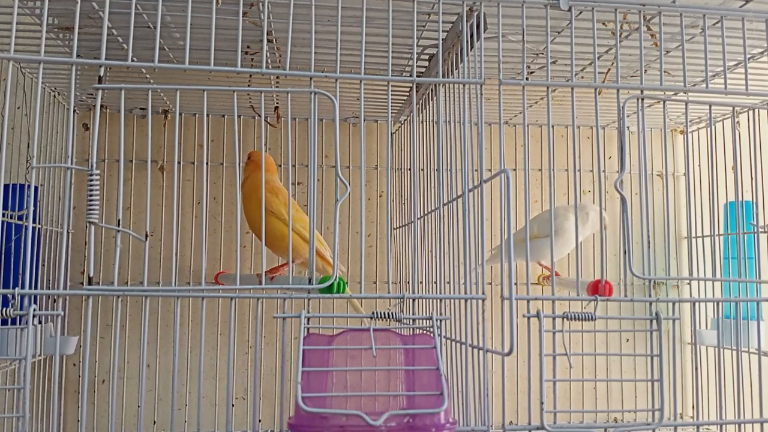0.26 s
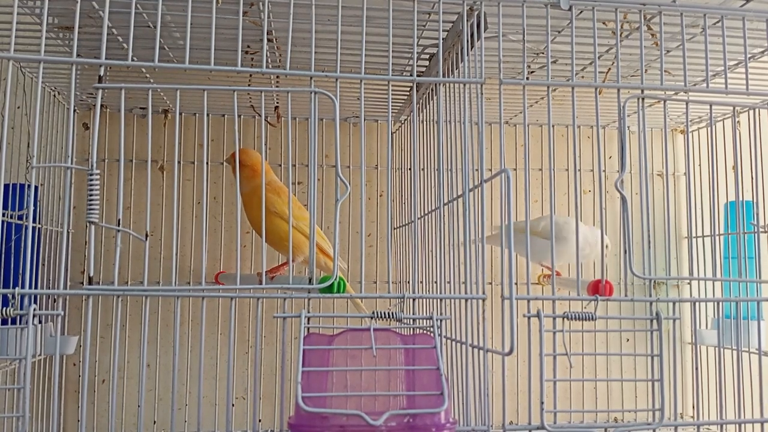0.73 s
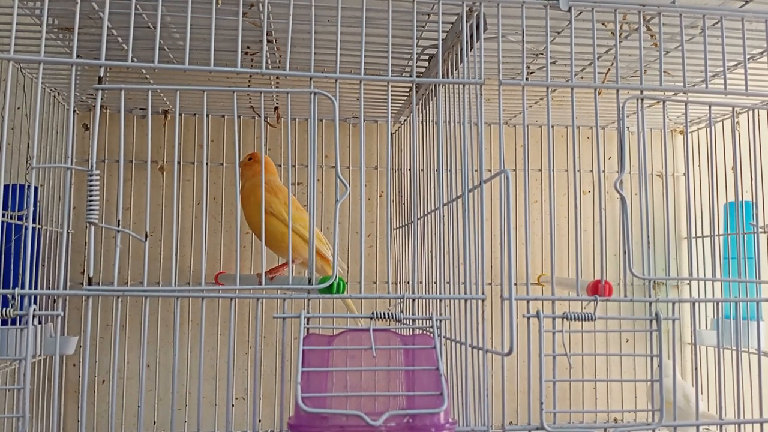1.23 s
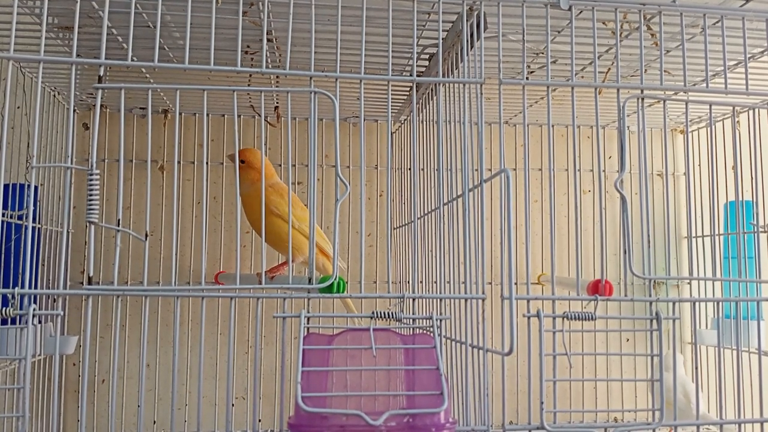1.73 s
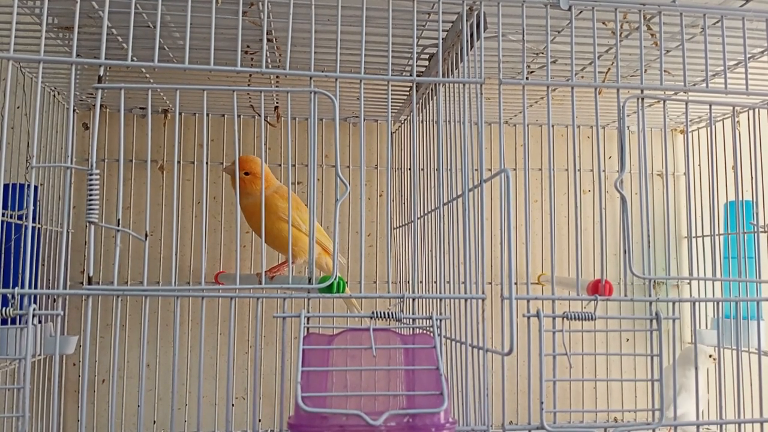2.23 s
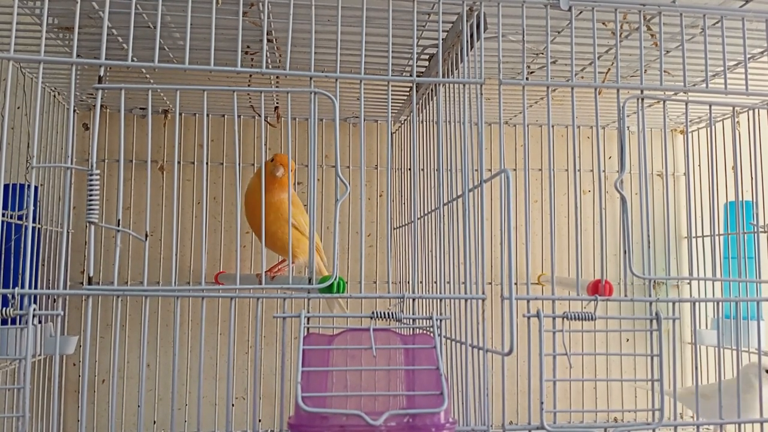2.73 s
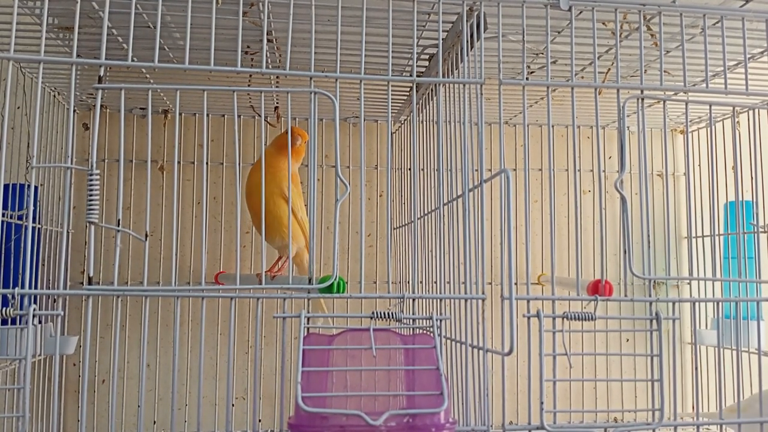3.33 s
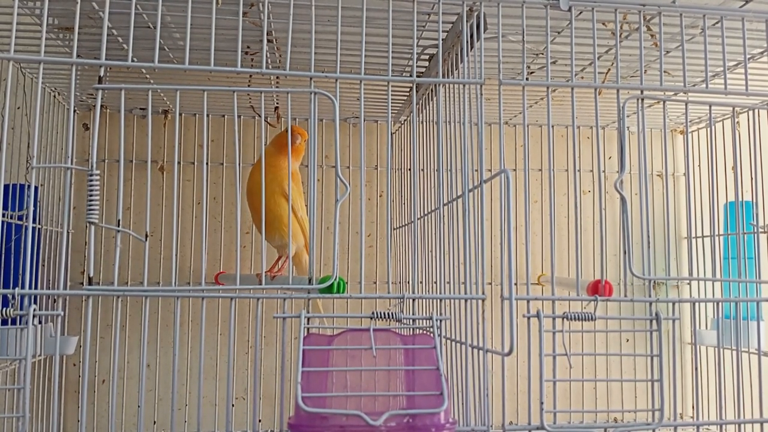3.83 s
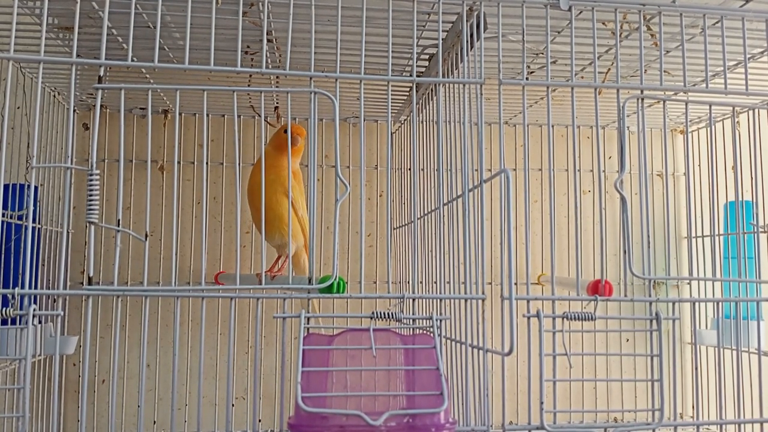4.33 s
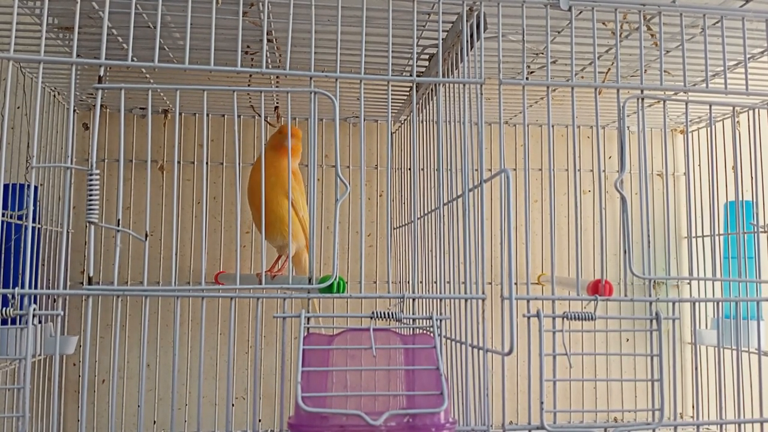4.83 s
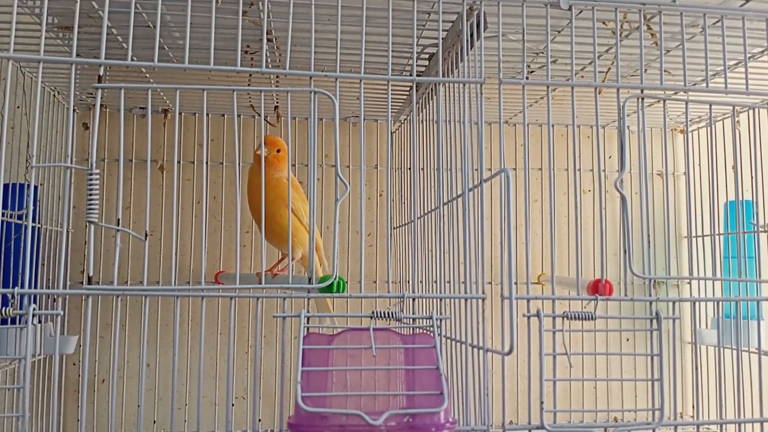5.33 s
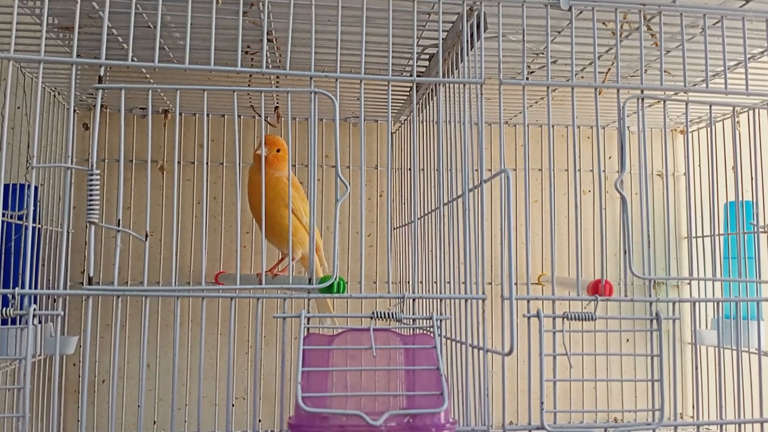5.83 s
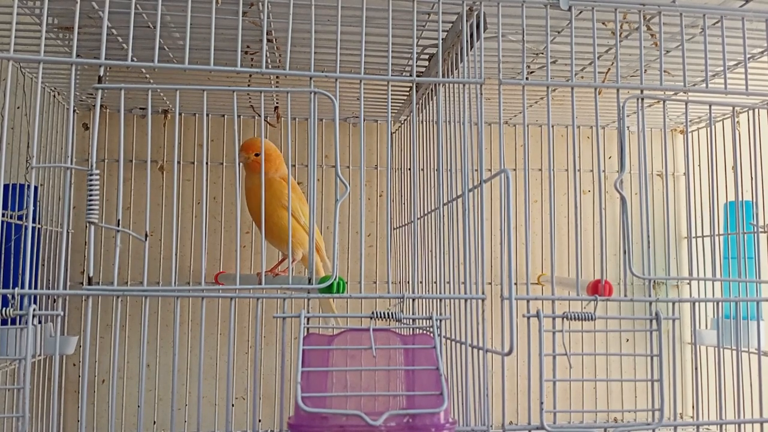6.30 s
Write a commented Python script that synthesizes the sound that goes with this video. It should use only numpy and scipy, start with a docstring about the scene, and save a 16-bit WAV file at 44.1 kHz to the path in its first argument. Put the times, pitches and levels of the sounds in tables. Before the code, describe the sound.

Bright canary song with a fast trill, then overlapping hooked chirps and whistles, a quieter lull and a final burst, in a hard-walled room.

```python
"""Canaries sing over one another in wire cages in a small hard-walled room, heard mostly off the walls.
Each note is a gliding near-sine from the syrinx with faint overtones and a puff of air.
Below lie a steady ventilation-like rush of banded noise and a low wavering drone of resonant noise;
late on, claws tick faintly on a wire. The microphone bends loud notes, colours the treble and is limited."""
import sys
import numpy as np
from scipy import signal
from scipy.fft import rfft, irfft
from scipy.io import wavfile
from scipy.ndimage import uniform_filter1d, minimum_filter1d

SR = 44100
rng = np.random.default_rng(int(sys.argv[2]) if len(sys.argv) > 2 else 0)


def wav_record(signal):
    """Record a signal, one row per channel, as 16-bit PCM in the file named by sys.argv[1]."""
    frames = np.transpose(np.atleast_2d(signal))
    bounded = np.clip(frames, -1, 1)
    # unit amplitude maps onto the largest positive 16-bit level
    quanta = np.round(bounded * 32767).astype(np.int16)
    wavfile.write(sys.argv[1], SR, quanta)


N = 289296

# Held, pure whistles. Each row: start in seconds, length in ms, start pitch in Hz, end pitch in Hz, level in dB.
WHISTLES = [(-.04, 35, 2992, 2812, 2), (-.04, 34.7, 4130, 3770, -13.5), (0.281, 26, 3150, 3070, -20.5),
            (0.361, 192, 3117, 3107, -14), (0.431, 31, 2495, 2326, -10.5), (0.499, 31, 2662, 2953, -6),
            (.525, 83, 3770, 3460, -24), (0.581, 164, 4000, 3570, -15.5), (0.628, 194, 3163, 3163, -17),
            (0.954, 192, 3185, 3090, -16.5), (1.101, 73, 2515, 2204, -16), (1.114, 16.3, 5090, 4080, -17),
            (1.139, 30, 5300, 6150, -28.5), (1.14, 18, 7500, 6630, -25), (1.173, 35, 4220, 4130, -13.5),
            (1.199, 89, 3990, 3820, -17), (1.24, 31, 2540, 2366, -12), (1.259, 107, 3086, 3065, -17.5),
            (1.48, 158, 2612, 3247, -16), (1.576, 58, 6260, 6230, -31), (1.808, 188, 3748, 3517, -12.5),
            (1.852, 24, 4050, 3940, -13), (1.888, 123, 1792, 1773, -32.5), (2.108, 41, 3476, 3600, -14.5),
            (2.134, 129, 3667, 3436, -10.5), (2.35, 36, 5090, 4730, -14), (2.32, 63, 1730, 1720, -37),
            (2.395, 162, 3501, 3505, -10.5), (2.763, 16.5, 5900, 6050, -21), (2.806, 94, 1722, 1614, -25.5),
            (3.125, 150, 1810, 1707, -24), (3.248, 31, 6490, 6510, -32.5), (3.262, 210, 3150, 3143, -27),
            (3.338, 58, 4170, 4920, -28.5), (3.477, 32, 3305, 3836, -10), (3.498, 27, 3850, 4004, -6.5),
            (3.511, 33, 4780, 6120, -26), (3.522, 8.9, 4260, 4350, -7), (3.581, 26.4, 4010, 3780, -4),
            (3.585, 52, 3186, 3170, -16.5), (3.635, 68, 3872, 4088, -11.5), (3.7, 51, 4335, 4160, -18),
            (3.688, 25, 3134, 3215, -16), (3.772, 45.5, 4220, 4105, -13), (3.88, 27, 2420, 2450, -20),
            (3.945, 94, 3160, 3090, -19), (4.324, 62, 4180, 4190, -15), (4.413, 27, 4310, 3710, -10),
            (4.717, 91, 1693, 1642, -32), (4.744, 38, 2685, 3560, -6.5), (4.801, 58, 3560, 3970, -21.5),
            (5.16, 57, 4140, 4090, -41.5), (5.55, 53, 2520, 2460, -28.5), (5.592, 76, 2737, 2826, -22),
            (5.674, 140, 2920, 3258, -25), (5.942, 116, 1732, 1687, -35.5), (6.035, 41, 3520, 3550, -41),
            (6.136, 32, 6300, 6070, -34), (6.272, 11, 3050, 3160, -7.5), (6.497, 22, 2560, 2530, -22),
            (6.54, 36, 2515, 2730, -16), (6.465, 130, 3936, 4487, -8.5), (6.502, 46, 6770, 6800, -32),
            (6.505, 19, 5800, 5740, -34), (6.546, 19, 5300, 5320, -16)]
# Octave overtone of pure notes. Each row: pitch in Hz, overtone level against the note in dB.
PURITY = [(1750, -12.5), (2450, -23), (3200, -64), (4000, -30.5), (6200, -46)]
# Hooked calls, pure or reedy, scoop up to a top and then glide off. Each row: start in seconds,
# length in ms, top pitch in Hz, end pitch in Hz, level in dB, octave overtone against the note in dB.
HOOKED_CALLS = [(1.831, 30, 2865, 2730, -14, -21.5), (2.383, 25, 3005, 2950, -15, -16),
                (2.427, 20.3, 2707, 2740, -10.5, -20.5), (2.578, 29, 4230, 3270, -8.5, -37),
                (2.641, 26.2, 4050, 3140, -9, -41), (2.716, 30.3, 3745, 3040, -11.5, -40),
                (2.961, 70, 2946, 2717, -13.5, -8), (3.109, 28, 2530, 2130, -19, -3),
                (3.136, 50.5, 2655, 2763, -12, -23), (3.444, 34, 2925, 2600, -13.5, -10.5),
                (3.495, 20.6, 2412, 2370, -14, -5.5), (3.86, 29, 2760, 2190, -19, -0.5),
                (3.894, 18, 3050, 3020, -21, -17), (3.953, 30, 2797, 2280, -15, -11),
                (4.005, 27.6, 2686, 2060, -10.5, -5), (4.064, 20, 3150, 2520, -10.5, -23),
                (4.129, 27, 2694, 1880, -18, -1.5), (4.18, 18.5, 2420, 1810, -25, -5),
                (4.209, 30, 2616, 1730, -14, -6), (4.305, 21.7, 3060, 3090, -15, -16.5),
                (4.576, 74, 2754, 2555, -13.5, -3), (4.709, 31.6, 2357, 2393, -12.5, -7),
                (5.268, 18, 4036, 4100, -33, -3), (5.271, 50, 3375, 3770, -31.5, -6),
                (5.353, 35.6, 2810, 2730, -24.5, -16.5), (5.364, 37, 3650, 3660, -26, -14),
                (5.372, 49, 3260, 3260, -27.5, -26), (6.135, 27, 2870, 2830, -21.5, -17),
                (6.197, 35, 3896, 3060, -10, -33), (6.252, 41.5, 3990, 3180, -11, -40),
                (6.307, 29.7, 2646, 2050, -13, -16.5), (6.33, 34.4, 3930, 3220, -9, -47),
                (6.374, 24.4, 2645, 1890, -14.5, -12), (6.389, 73, 3930, 3450, -19.5, -31),
                (6.452, 33, 3816, 2784, -10, -42), (6.52, 23, 2246, 2440, -16.5, -10)]
# Fast straight sweeps. Each row: start in seconds, start pitch in Hz, end pitch in Hz, level in dB.
CHIPS = [(-.037, 2585, 1480, -5.5), (-.03, 3720, 2930, 6), (.443, 4850, 6300, -31),
         (.475, 4920, 6550, -14.5), (.55, 2570, 1890, -1), (.66, 2510, 1800, -7), (0.856, 2240, 1700, -9.5),
         (0.46, 6300, 4700, -19), (1.267, 3850, 3100, -8), (1.451, 3270, 3110, -3.5),
         (1.534, 5700, 6220, -19), (1.545, 5710, 5630, -11), (1.604, 6150, 4700, -27),
         (2.066, 5930, 4070, -10.5), (2.365, 4120, 4760, -12), (2.526, 6850, 3670, -19.5),
         (2.771, 5630, 4100, -13), (3.068, 4300, 4830, -21), (3.103, 5850, 2730, -8.5),
         (3.492, 4320, 5530, -21), (3.545, 5860, 4410, -13), (3.574, 5520, 4340, -14),
         (3.611, 5840, 4400, -27), (3.842, 4400, 4960, -19), (3.592, 3220, 3910, 0.5),
         (6.146, 6500, 3570, -29), (6.153, 5590, 2660, -11.5), (6.177, 4720, 4200, -31),
         (6.218, 3950, 3200, -2), (6.222, 5380, 4300, -16), (6.222, 3170, 1920, -5), (6.286, 3870, 2920, 2)]
# The trill's syllable: whistle, slide, glide, drop. Each row: delay in ms, length in ms, start pitch in Hz,
# middle pitch in Hz, end pitch in Hz, level in dB before the trill's changing level,
# octave overtone against the note in dB.
SYLLABLE = [(0, 34, 3950, 3840, 3780, 1.5, -25), (20, 18, 3650, 3350, 3000, -16, -40),
            (28, 40, 2950, 2600, 2430, 0.5, -46), (59, 15, 2450, 2050, 1400, -16, -20)]
# Level of the trill's parts as heard over time, added to the syllable's own. Each row: time in seconds,
# whistle in dB, slide and glide in dB, drop in dB.
ROLL_LEVELS = [(.05, -13.5, -10, -2), (0.281, -21.5, -11.5, 1.5), (0.399, -13.5, -15, -5),
               (.52, -15, -24, 4), (0.639, -26, -25, 2), (.8, -12.5, -11, -4), (.93, -15, -14.5, 4.5),
               (1.22, -16, -12, -4.5), (1.55, -18, -9, 1.5), (1.7, -16, -23, -5.5)]
# Dying time of the room. Each row: pitch in Hz, seconds to fall by 60 dB.
ROOM_T60 = [(1500, 0.74), (4000, 0.54), (9000, 0.48)]
# Colour of the rush. Each row: pitch in Hz, relative density in dB per Hz.
RUSH_COLOUR = [(22, -41.5), (64, -8.5), (105, -15.5), (190, -4), (310, 0.5), (480, -8), (850, -1.5),
               (1300, -9.5), (2700, -9), (4500, -48.5), (6000, -33.5), (8000, -40.5), (10500, -65),
               (15000, -62.5)]
# Hums of the drone. Each row: pitch in Hz, width in Hz, level before the swell in dB.
DRONE_HUMS = [(77, 3.6, -43), (135.7, 9.4, -42), (311, 59, -38.5)]
# Swell of the drone; only the departure from each column's mean counts.
# Each row: time in seconds, lowest hum in dB, upper hums in dB.
DRONE_SWELL = [(0, -38, -36), (.7, -35.5, -31.5), (1.3, -46.5, -38.5), (2.15, -42, -28.5),
               (2.7, -47.5, -37), (3.099, -42.5, -26.5), (3.75, -44, -39), (4.4, -38, -34.5),
               (5.2, -37, -32.5), (6.56, -45.5, -39.5)]
# Claws on a wire. Each row: start in seconds, peak before the high-pass in dB.
TICKS = [(4.986, -70), (5.035, -83), (5.1374, -48)]
# Treble colour of the microphone. Each row: pitch in Hz, gain in dB.
MICROPHONE = [(6500, 0), (8200, 1), (9800, -4.5), (11800, 0.5), (15300, -2)]

GLIDE_LEFT = .33   # share of a whistle's glide still to come at half its length
SCOOP, SCOOP_PER_FALL = 0.0523, 0.29   # a hooked call starts this share below its top, and lower by this share of its fall
HOOK_LATE, HOOK_FADE_MS = 1.426, 2.73   # power by which a hooked call clings to its top; its quick stop
CHIP_MS, CHIP_HZ_PER_MS = 6.0, 630   # shortest sweep; each further ms covers this much more
ROLL_START_S, ROLL_PERIOD_S, ROLL_SYLLABLES = .0467, .1177, 15
ROLL_UNEVEN_DB, ROLL_UNEVEN_PITCH = 1.5, 0.0262   # spread of level; spread of pitch as a share
ROLL_SLIP_MS = 1.2   # all but the whistle come this much earlier in each syllable than in the last

QUIVER_PITCH, QUIVER_DB, QUIVER_HZ = 0.0078, 3.5, 98   # spread as a share of pitch; spread in dB; pace
THIRD_DB, FOURTH_DB = -26, -34.5   # harmonics, before half the octave overtone's dB is added
OCTAVE_GROWS_DB = 14   # the octave overtone gains this much through a note
HALF_DB = -28   # lines halfway between the harmonics, against the octave overtone at mid-note
BREATH_DB, BREATH_HELD, PUFF_MS = -30, 0.092, 4.0   # airflow noise; share that lasts; dying time of the rest
EDGE_MS = 29.6   # a note swells and fades over this time, or over half its length if shorter

DIRECT_DB, ROOM_DB = -3, 4.5
ROLL_FARTHER_DB, CHIP_FARTHER_DB = -4, -8   # trilling and chipping birds sit farther off: less direct sound
EARLY_DB, EARLY_S = -6.5, 0.025   # extra early reflections against the tail; their dying time
ECHO_DB, ECHO_FIRST_S, ECHO_LAST_S = -11, .012, .045   # separate wall echoes, against nearer birds' direct sound

RUSH_DB = -32.5
TREBLE_DRIFT_FROM_HZ, TREBLE_DRIFT_DB = 6000, 4   # bands starting above this pitch share one level drift; spread
TICK_HZ, TICK_MS = 8000, 2.8   # heard above this pitch; dying time

LOPSIDED_DB, SQUEEZE_DB = -23.5, -28.5   # square-law and cube-law parts of the microphone
LIMIT_MS = 20   # the limiter looks this far each way and smooths over as long
CUTOFF_HZ = 15900


def from_db(db):
    """dB to gain."""
    return 10 ** (np.asarray(db) / 20)


def rms_one(x):
    """Scale to unit rms."""
    return x / np.sqrt(np.mean(x ** 2) + 1e-20)


def at_hz(points, hz):
    """Read a table of pitch and value on a log-frequency axis."""
    table_hz, values = np.transpose(points)
    return np.interp(np.log(hz), np.log(table_hz), values)


def drift(rate_hz):
    """Random wander, spread 1: low-passed noise made at a fortieth of the sample rate."""
    r = np.exp(-80 * np.pi * rate_hz / SR)
    noise = rng.standard_normal(N // 40 + 2002)
    slow = signal.lfilter([1], [1, -2 * r, r * r], noise)[2000:]   # past the filter's start
    return np.interp(np.arange(N) / 40, np.arange(len(slow)), rms_one(slow))


def band_noise(white, low_hz, high_hz):
    """Noise between two pitches."""
    return signal.sosfilt(signal.butter(2, [low_hz, high_hz], "band", fs=SR, output="sos"), white)


def song():
    """Whistles and hooked calls as notes in order of time; the middle pitch follows the rule of each kind."""
    rows = []
    for s, ms, start, end, db in WHISTLES:
        middle = end + GLIDE_LEFT * (start - end)
        rows.append((s, ms, start, middle, end, db, at_hz(PURITY, end), False))
    for s, ms, top, end, db, octave_db in HOOKED_CALLS:
        start = (1 - SCOOP) * top - SCOOP_PER_FALL * max(top - end, 0)
        rows.append((s, ms, start, top, end, db, octave_db, True))
    return sorted(rows)


def chips():
    """Straight sweeps as notes; the wider the sweep, the longer."""
    rows = []
    for s, start, end, db in CHIPS:
        ms = CHIP_MS + abs(start - end) / CHIP_HZ_PER_MS
        middle = (start + end) / 2
        rows.append((s, ms, start, middle, end, db, at_hz(PURITY, middle), False))
    return rows


def roll():
    """A rolling trill as notes: one four-part syllable at a steady pace, with changing levels."""
    rows = []
    at, whistle_db, glide_db, drop_db = np.transpose(ROLL_LEVELS)
    part_levels = (whistle_db, glide_db, glide_db, drop_db)
    chance = rng.standard_normal((ROLL_SYLLABLES, 5))
    for k, (detune, *uneven) in enumerate(chance):
        s = ROLL_START_S + k * ROLL_PERIOD_S
        for part, part_level, odd in zip(SYLLABLE, part_levels, uneven):
            delay, ms, start, middle, end, db, octave_db = part
            level_db = db + np.interp(s, at, part_level) + ROLL_UNEVEN_DB * odd
            if delay > 0:   # all but the whistle slip earlier and land on slightly different pitches
                delay = delay - k * ROLL_SLIP_MS
                bend = 1 + ROLL_UNEVEN_PITCH * detune
                middle, end = middle * bend, end * bend
            rows.append((s + delay / 1000, ms, start, middle, end, level_db, octave_db, False))
    return rows


def note(length_ms, start_hz, middle_hz, end_hz, level_db, octave_db, hooked, air, quiver):
    """One syrinx note: pitch on a parabola through three points, overtones, and turbulent air."""
    u = np.linspace(0, 1, int(length_ms * SR / 1000))
    air, quiver = air[:len(u)], quiver[:len(u)]
    # a hooked call clings to its top, then drops steeply
    v = np.where(hooked & (u > .5), .5 + .5 * np.abs(2 * u - 1) ** HOOK_LATE, u)
    hz = 2 * start_hz * (v - .5) * (v - 1) - 4 * middle_hz * v * (v - 1) + 2 * end_hz * v * (v - .5)
    # the membranes are never quite steady: pitch and strength tremble together
    turn = 2 * np.pi * np.cumsum(hz * (1 + QUIVER_PITCH * quiver)) / SR

    octave = from_db(octave_db + OCTAVE_GROWS_DB * (u - .5)) * np.sin(2 * turn)
    third = from_db(THIRD_DB + octave_db / 2) * np.sin(3 * turn)
    fourth = from_db(FOURTH_DB + octave_db / 2) * np.sin(4 * turn) * (hz < SR / 8)   # kept below SR / 2
    halves = from_db(HALF_DB + octave_db) * (np.sin(3 * turn / 2) + np.sin(5 * turn / 2))
    tone = np.sin(turn) + octave + third + fourth + halves

    rise = max(length_ms / EDGE_MS, 2)
    fade = max(length_ms / (HOOK_FADE_MS if hooked else EDGE_MS), 2)
    edges = np.minimum(np.minimum(u * rise, (1 - u) * fade), 1)
    swell = np.sin(np.pi / 2 * edges) ** .8 * from_db(QUIVER_DB * quiver)
    puff = air * (BREATH_HELD + np.exp(-u * length_ms / PUFF_MS))   # air rushes most as the note opens
    return from_db(level_db) * swell * (tone + from_db(BREATH_DB) * puff)


def birds(count):
    """All notes dealt in turn to singing places, sweeps and trill to two each; returns places x samples."""
    out = np.zeros((count, N + 2 * SR))
    air = rng.standard_normal(N + 2 * SR)
    quiver = np.pad(drift(QUIVER_HZ), SR, mode="reflect")
    dealt = [(k % (count - 4), row) for k, row in enumerate(song())]
    dealt += [(-1 - k % 2, row) for k, row in enumerate(roll())]
    dealt += [(-3 - k % 2, row) for k, row in enumerate(chips())]
    for place, (s, *shape) in dealt:
        at = int((s + 1) * SR)   # one second of lead-in lets the first notes start early
        sound = note(*shape, air[at:], quiver[at:])
        out[place, at:at + len(sound)] += sound
    return out


def room(places):
    """Direct sound plus a dense echo tail for each place: noise dying band by band, with a few wall echoes."""
    t = np.arange(int(.7 * SR)) / SR
    edges = np.geomspace(900, 18000, 8)
    white = rng.standard_normal((len(places), len(t)))
    tails = 0
    for low, high in zip(edges, edges[1:]):
        t60 = at_hz(ROOM_T60, np.sqrt(low * high))
        even_energy = np.sqrt(2 * np.log(1000) / t60 / SR)   # long and short tails weigh the same
        tails = tails + band_noise(white, low, high) * from_db(-60 * t / t60) * even_energy
    thicken = 1 - np.exp(-t / 0.0017)   # reflections build up over the first moments
    tails = tails * thicken * (1 + from_db(EARLY_DB) * np.exp(-t / EARLY_S))
    echoes = (rng.uniform(ECHO_FIRST_S, ECHO_LAST_S, (len(places), 3)) * SR).astype(int)
    np.put_along_axis(tails, echoes, from_db(ECHO_DB + DIRECT_DB - ROOM_DB), axis=1)
    wet = signal.fftconvolve(places, tails, axes=1)[:, :places.shape[1]]
    farther_db = np.r_[np.zeros(len(places) - 4), [CHIP_FARTHER_DB] * 2, [ROLL_FARTHER_DB] * 2]
    direct = from_db(DIRECT_DB + farther_db)[:, None] * places
    return (direct + from_db(ROOM_DB) * wet).sum(axis=0)[SR:SR + N]   # lead-in cut off


def rush(patchy_db):
    """Half-octave noise bands, each wavering a little; the treble noise bands share one random level drift."""
    out = 0
    edges = 25 * 2 ** np.arange(0, 9.6, .5)
    white = rng.standard_normal((2, N))   # neighbouring bands take different noise
    treble_drift_db = TREBLE_DRIFT_DB * drift(3.0)
    for k, (low, high) in enumerate(zip(edges, edges[1:])):
        level_db = at_hz(RUSH_COLOUR, np.sqrt(low * high)) + patchy_db * drift(6.2)
        level_db = level_db + treble_drift_db * (low > TREBLE_DRIFT_FROM_HZ)
        out = out + band_noise(white[k % 2], low, high) * from_db(level_db)
    return from_db(RUSH_DB) * rms_one(out)


def drone():
    """Noise through low resonances, swelling slowly."""
    out = 0
    s, low_db, upper_db = np.transpose(DRONE_SWELL)
    for (hz, width, level_db), swell_db in zip(DRONE_HUMS, (low_db, upper_db, upper_db)):
        r = np.exp(-np.pi * width / SR)
        resonance = [1, -2 * r * np.cos(2 * np.pi * hz / SR), r * r]
        hum = signal.lfilter([1, 0, -1], resonance, rng.standard_normal(N))
        swell = np.interp(np.arange(N) / SR, s, swell_db - swell_db.mean())
        out = out + rms_one(hum) * from_db(level_db + swell + 1.0 * drift(1.4))
    return out


def ticks():
    """Claws on a wire: short bright bursts of noise, each dying at once."""
    t = np.arange(N) / SR
    bursts = 0
    for s, db in TICKS:
        bursts = bursts + from_db(db) * (t > s) * np.exp(-np.maximum(t - s, 0) * 1000 / TICK_MS)
    high_pass = signal.butter(4, TICK_HZ, "high", fs=SR, output="sos")
    return signal.sosfilt(high_pass, bursts * rng.standard_normal(N) + 1e-18)


def scene():
    """Birds in the room over the background."""
    return (room(birds(count=10)) + rush(patchy_db=2.5) + drone() + ticks())[None]


def record(dry):
    """A lopsided microphone mixes loud notes into sum and difference tones; a limiter holds the peaks."""
    hz = np.arange(1, N // 2 + 2) * SR / N
    coloured = irfft(rfft(dry) * from_db(at_hz(MICROPHONE, hz)), N)
    square = signal.lfilter([1, -1], [1, -.97], coloured ** 2)   # steady offset removed
    bent = coloured + from_db(LOPSIDED_DB) * square - from_db(SQUEEZE_DB) * coloured ** 3
    span = int(LIMIT_MS * SR / 1000)
    room_left = minimum_filter1d(1 / np.maximum(np.abs(bent), 1), 2 * span + 1)
    limited = bent * uniform_filter1d(room_left, span)
    return signal.sosfilt(signal.cheby2(24, 70, CUTOFF_HZ, fs=SR, output="sos"), limited)


dry = scene()
out = record(dry)
wav_record(out)
```